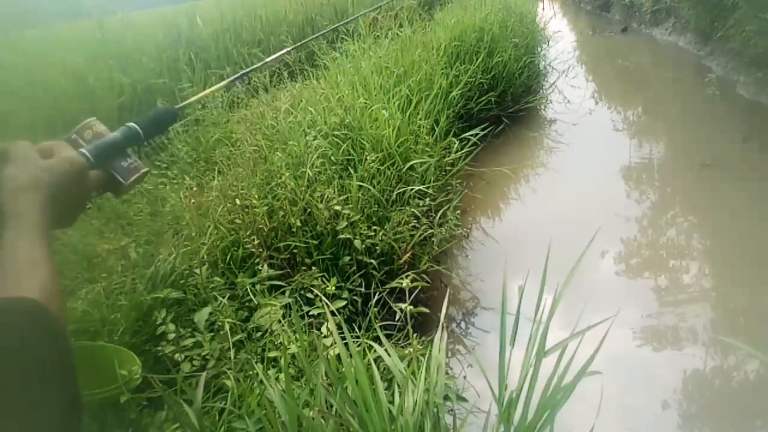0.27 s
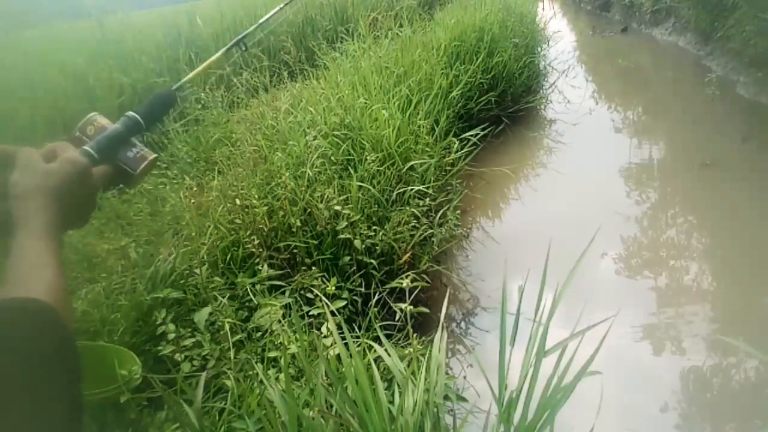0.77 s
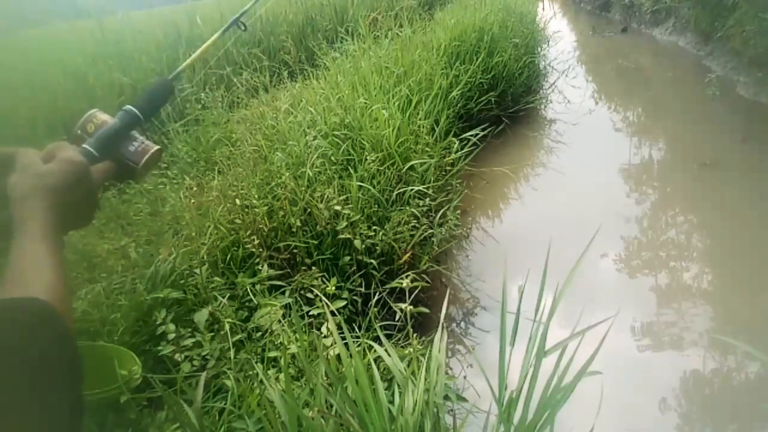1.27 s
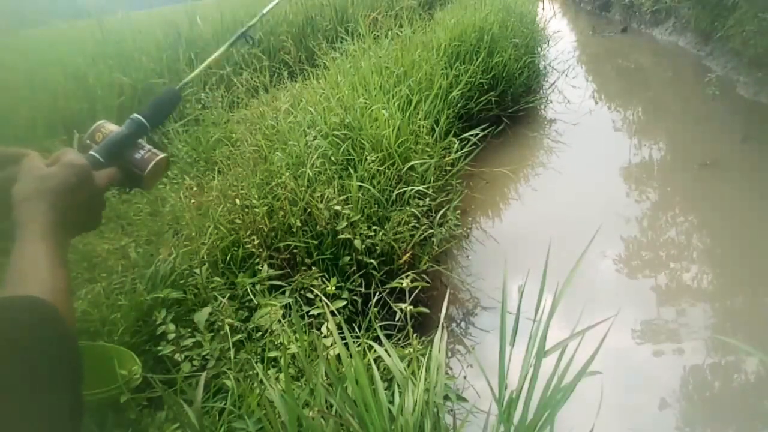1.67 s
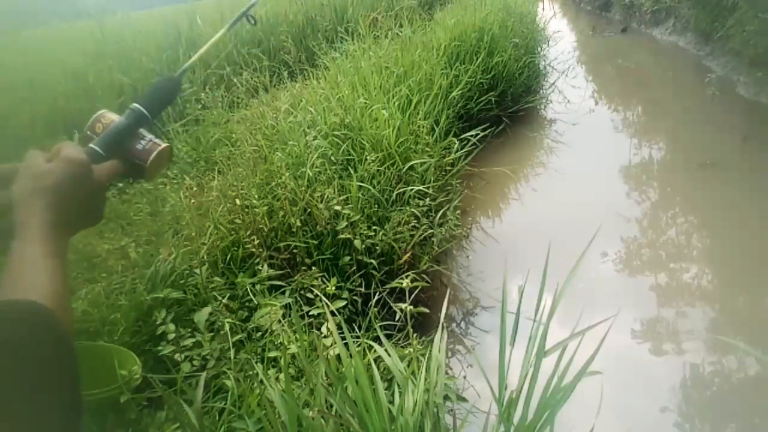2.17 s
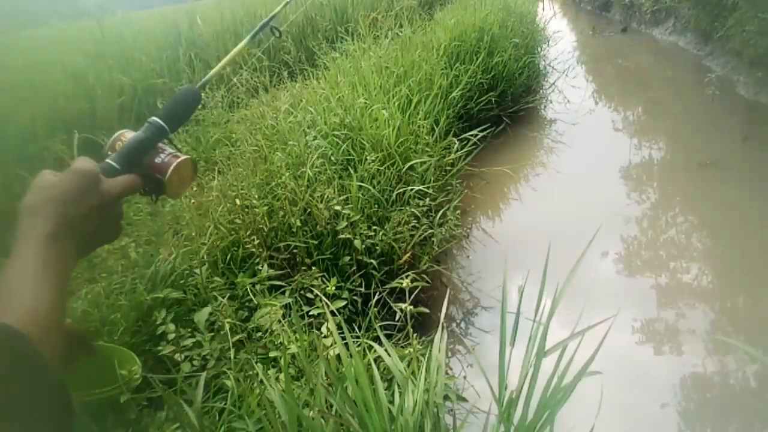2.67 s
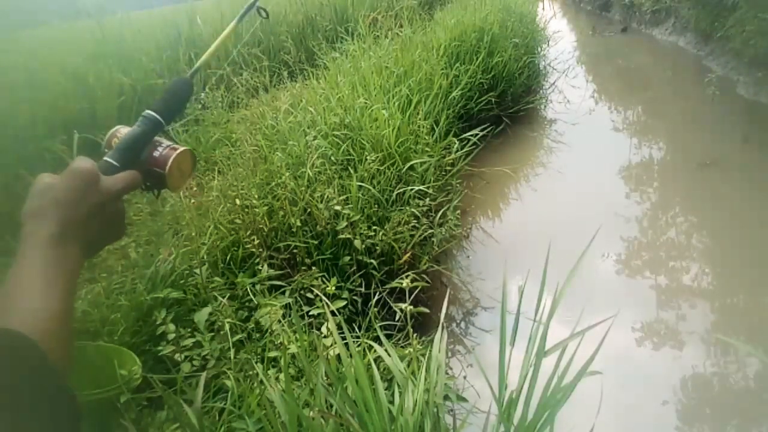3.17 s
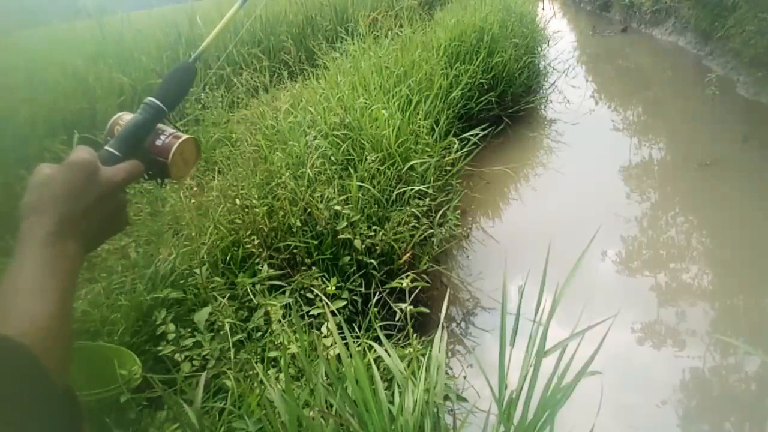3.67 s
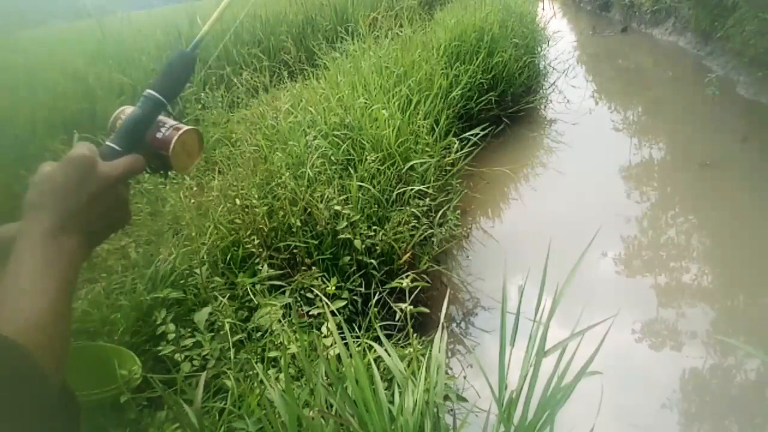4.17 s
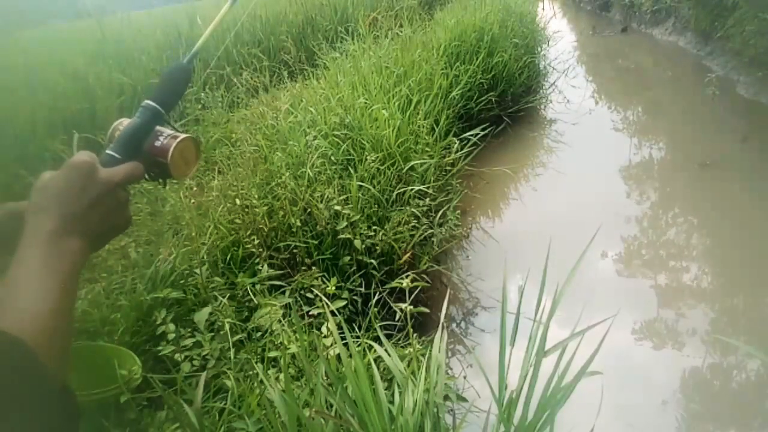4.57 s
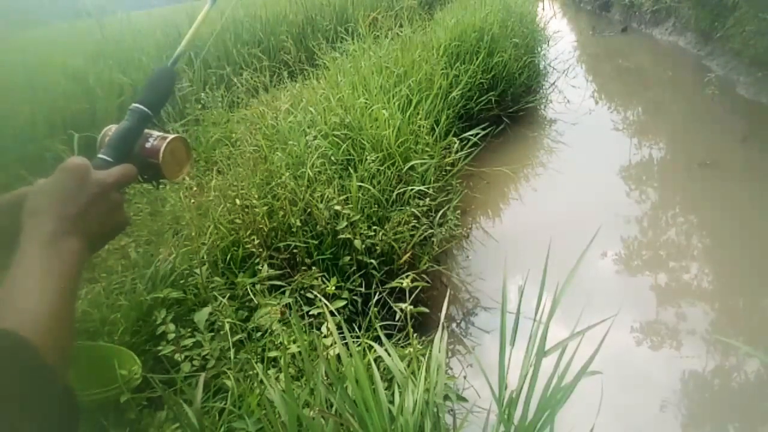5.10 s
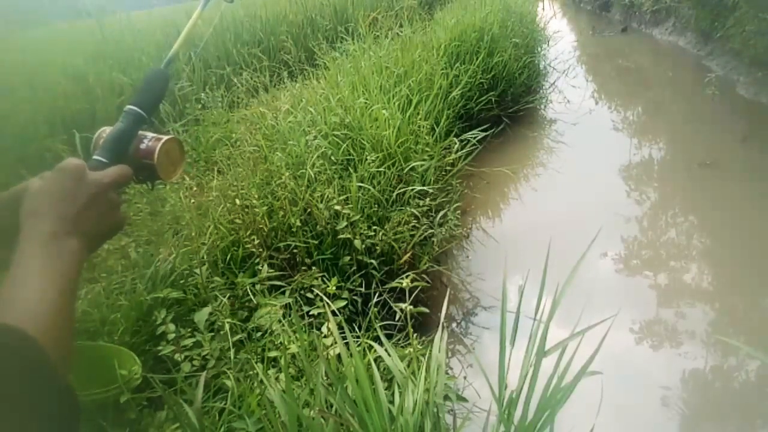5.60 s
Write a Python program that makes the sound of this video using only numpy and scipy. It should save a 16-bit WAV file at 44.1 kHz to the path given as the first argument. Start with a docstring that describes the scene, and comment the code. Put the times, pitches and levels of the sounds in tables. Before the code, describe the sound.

Beside a ditch among rice paddies, a crowd of frogs rattles continuously while nearer frogs give short, slightly falling whistles and an insect scrapes a high, often-broken buzz. Far insects hiss behind. The microphone worn by an angler picks up faint rubbing, a hollow knock just before three seconds, then low rumbling with soft bumps and sparse clicks until the end.

```python
"""A crowd of frogs rattles all along beside a ditch among rice paddies: pulses ring throat resonances.
From the start nearer frogs whistle short falling notes, and an insect scrapes out a long, often-broken buzz.
Far insects and open air add a hiss. An angler wears the microphone: at first it picks up light rubbing.
Shortly before three seconds comes one hollow knock, made of a few dying tones.
Then a heavier handling rumble of low noise with soft bumps lasts to the end; sparse random clicks are heard in it."""
import sys
import numpy as np
from scipy import signal
from scipy.fft import rfft, irfft, next_fast_len
from scipy.io import wavfile
from scipy.ndimage import uniform_filter1d, map_coordinates

SR = 44100
rng = np.random.default_rng(int(sys.argv[2]) if len(sys.argv) > 2 else 0)


def store_pcm(level_fs):
    """Save levels as 16-bit WAV."""
    pcm = np.round(np.clip(level_fs, -1, 1) * 32767).astype(np.int16)
    wavfile.write(sys.argv[1], SR, np.atleast_2d(pcm).T)


N = 257527

# throat resonances of the rattling frogs, before any swell: centre_hz, width_hz, level_db
THROAT_RESONANCES = [(1166.3, 79, -64), (1251.5, 94, -62.5), (1437, 51, -76), (1712, 91, -84.5),
                     (1937, 56, -73), (2238, 105, -58.5), (2469, 155, -59), (3230, 750, -80.5),
                     (3493, 197, -59), (3641, 67, -58), (3810, 530, -56.5), (4436, 280, -61.5),
                     (4738, 140, -58), (5955, 75, -63.5), (5972, 360, -63), (7180, 210, -69.5),
                     (8314, 180, -70.5)]
# how the high and the deep frog voices swell: time_s, change_db
HIGH_SWELL = [(0, -3), (.7, 0.5), (1.4, -2), (2.1, 1.5), (2.6, -3), (3.05, 0), (3.7, -1), (4.2, -0.5),
              (4.8, 0.5), (5.2, 0), (5.84, -0.5)]
DEEP_SWELL = [(0, -1.5), (.9, -1.5), (1.7, 1.5), (2.3, -0.5), (2.8, -1), (3.6, 1.5), (4.4, 1), (5, 1.5),
              (5.84, -.5)]
# whistling frogs by name: first_pitch_hz, last_pitch_hz, swell_db, push_time (share of the note),
# fundamental_db (against the whistle), flutter_db
WHISTLE_VOICES = {"near": (2236.5, 2165.5, 6.5, 0.9, -23.5, 0.9),
                  "high": (2271.5, 2185.5, 4, 0.8, -19, 1.27), "throaty": (2222.5, 2170, 1, 2.5, -10, 2.1)}
# nearby whistled notes, level before swell and flutter: start_s, length_s, level_db, voice name
WHISTLED_NOTES = [(0.059, 0.17, -52.5, "throaty"), (.231, 0.19, -48.5, "high"), (.876, 0.16, -41.5, "near"),
                  (1.357, 0.2, -56.5, "throaty"), (1.361, .18, -50, "high"), (2.077, 0.17, -42.5, "near"),
                  (2.483, .26, -50.5, "high"), (2.67, 0.19, -52.5, "throaty"), (3.287, 0.15, -41.5, "near"),
                  (3.671, 0.19, -48.5, "high"), (3.929, 0.201, -54, "throaty"), (4.461, .158, -43, "near"),
                  (4.836, 0.18, -49.5, "high"), (5.221, 0.16, -54.5, "throaty"),
                  (5.649, .16, -41.5, "near")]
# far frogs that keep time: first_note_s, period_s, length_s, first_pitch_hz, last_pitch_hz, level_db
FAR_WHISTLERS = [(0.659, 1.205, 0.138, 2264, 2260, -61), (.99, 1.221, 0.163, 2360, 2325, -62)]
# the voice they share: swell_db, push_time (share of the note), fundamental_db, flutter_db
FAR_WHISTLE_VOICE = (-1, -2.5, -15.5, 2.5)
# scrapes within one wing cycle: position (share of the cycle), level_db
WING_SCRAPES = [(0, -6), (0.272, -1), (0.519, -5), (.76, -7)]
# tone colour of the wings, only its shape matters: frequency_hz, level_db (per Hz)
WING_COLOUR = [(4100, -34), (4550, 7.5), (4690, 9.5), (4850, 8), (5150, -13.5), (7000, -4), (7700, -12.5),
               (9050, -11), (9480, 7), (10250, -13.5), (10600, 0), (11300, -21), (15500, -23.5)]
# high resonances of the wing, before the phrasing: centre_hz, width_hz, level_db
WING_RESONANCES = [(12150, 600, -77.5), (13200, 600, -79), (14230, 450, -78.5), (15250, 400, -77.5)]
# how hard the insect works, only differences matter: time_s, level_db
INSECT_EFFORT = [(0, 0), (.3, -4), (.65, 0), (1.25, -1), (1.5, -5), (1.85, -1.5), (3.1, 0.5), (3.8, -2),
                 (4.35, 1), (4.85, -4), (5.2, 0.5), (5.84, -2)]
# hollow tones of the knock, level before its soft onset: pitch_hz, level_db, time to fall by 60 dB (s)
KNOCK_TONES = [(380, -23, 0.024), (436, -58, 0.28), (290, -54, 0.03), (795, -46, 0.028)]
# tone colours of the light rubbing and the heavy rumble, only shapes matter: frequency_hz, level_db (per Hz)
RUB_COLOUR = [(15, -54), (25, -21), (38, -26.5), (130, 4.5), (152, 1), (194, -15), (260, -21.5), (340, -25),
              (570, -120)]
RUMBLE_COLOUR = [(15, -58), (25, -33), (61, 3.5), (92, -1), (142, -1), (252, -25), (525, -54.5), (900, -55),
                 (1170, -73), (1980, -120)]
# strokes of light rubbing, to which a flutter and an offset are added: start_s, length_s, level_db
RUB_STROKES = [(0.246, 0.41, -59.5), (0.814, 0.39, -62.5), (1.38, 0.37, -60.5), (2.145, 0.86, -59)]
# loudness of the heavy rumble, to which the rumble level offset is added: time_s, level_db
RUMBLE_LEVEL = [(3.6, -70.5), (4.05, -53.5), (4.2, -49), (4.28, -60), (4.45, -54.5), (4.8, -47.5),
                (4.93, -55), (5.15, -46), (5.45, -53.5), (5.67, -60.5), (5.76, -49.5), (5.84, -50)]
# soft bumps, level at the top of the envelope: time_s, level_db, pitch_hz
SOFT_BUMPS = [(4.02, -41.5, 66), (4.125, -33, 79), (4.211, -46, 85), (4.421, -40, 89.5), (4.577, -35, 80),
              (4.793, -33, 92), (5.035, -32.5, 86.5), (5.173, -35, 88.6), (5.762, -35.5, 84)]
# tone colour of the far hiss, only its shape matters: frequency_hz, level_db (per Hz)
HISS_COLOUR = [(30, -3.5), (120, 4), (250, -8.5), (500, -14), (900, -17.5), (1700, -16), (3000, 2),
               (6500, -4), (7800, -6), (9100, -1), (9650, 2), (10700, 0), (11400, -17), (15500, -29)]

DEEP_BELOW_HZ, HIGH_ABOVE_HZ = 1600, 3100  # voices in between do not swell
NOTE_ATTACK_S, NOTE_RELEASE_S = 0.014, 0.012
PUSH_WIDTH, SAG_POWER = 0.22, 1.26  # width is a share of the note; the power bends the fall in pitch
WING_HZ, BUZZ_DB = 28.1, -55.0  # average wing cycles a second; level of the main buzz
PHRASE_END_S, PHRASE_PERIOD_S = 0.822, 1.197  # end of the first phrase, time from one end to the next
REST_S, STOP_S, RESUME_S, REST_DB = 0.16, 0.036, 0.16, -8.5  # rest, fade-out, fade-in, drop in a rest
KNOCK_S = 2.8098
HEAVY_START_S, HEAVY_FADE_S = 3.6, 0.07  # when rumble takes over from rubbing
RUB_ATTACK_S, RUB_RELEASE_S, RUB_REST_DB = 0.042, 0.046, -77
RUB_OFFSET_DB, RUMBLE_OFFSET_DB = -1.0, -0.5  # rubbing and rumble level offsets
CLICK_DB, CLICKS_PER_S = -27.5, 45  # level relative to the low noise of the rumble
BUMP_S = 0.008  # from a bump's top to about a third of it
HISS_DB = -56
TOP_HZ = 15520


def chorus():
    """Groups of frogs ring throat resonances pulse by pulse; deep and high voices each swell together."""
    groups = [rattle(pulse_rate=94, spread=0.15, note_db=2.0, count=3) for _ in range(5)]
    high_db, deep_db = curve(HIGH_SWELL), curve(DEEP_SWELL)
    out = np.zeros(N)
    for k, (centre, width, db) in enumerate(THROAT_RESONANCES):
        swell_db = high_db * (centre > HIGH_ABOVE_HZ) + deep_db * (centre < DEEP_BELOW_HZ)
        out += resonance(groups[k % len(groups)], centre, width) * amp(db + swell_db)
    return patchy(out, depth_db=1.5)  # frogs of different size join in and drop out


def rattle(pulse_rate, spread, note_db, count):
    """Pulses of several frogs, each at its own rate and swelling in quick notes."""
    pulses = np.zeros(N)
    for own, start in rng.standard_normal((count, 2)):
        rate = pulse_rate * np.exp(spread * own + 0.06 * wobble(12))
        whole_cycles = np.floor(start + np.cumsum(rate) / SR)
        beats = np.diff(whole_cycles, prepend=whole_cycles[0])  # one pulse per finished cycle
        pulses += beats * amp(note_db * wobble(19))
    return pulses


def whistlers():
    """Three nearby frogs and two far ones each repeat their own note about every 1.2 s."""
    out = np.zeros(N)
    for start, length, db, voice in WHISTLED_NOTES:
        out += whistle(start, length, db, *WHISTLE_VOICES[voice])
    for first, period, length, first_hz, last_hz, db in FAR_WHISTLERS:
        for start in np.arange(first, N / SR - length, period):
            out += whistle(start, length, db, first_hz, last_hz, *FAR_WHISTLE_VOICE)
    return outdoors(out, wet_db=-13, t60=0.3)


def whistle(start, length, db, first_hz, last_hz, swell_db, push_at, fundamental_db, flutter_db):
    """One note sags in pitch, then stops short; the vocal sac favours the second harmonic."""
    t = clock() - start
    on = (t > 0) & (t < length)
    t = t[on]
    share = t / length

    def chance(rate):
        """A smooth random curve within the note."""
        return map_coordinates(rng.standard_normal(128), [t * rate], mode="wrap")

    pitch_hz = first_hz + (last_hz - first_hz) * share ** SAG_POWER + 7 * chance(88)
    phase = np.pi * np.cumsum(pitch_hz) / SR  # the fundamental lies an octave below the heard pitch
    attack = np.clip(t / NOTE_ATTACK_S, 0, 1)
    release = np.clip((length - t) / NOTE_RELEASE_S, 0, 1)
    flutter = amp(flutter_db * (chance(170) + chance(49)))
    push = np.exp(-((share - push_at) / PUSH_WIDTH) ** 2)
    main = amp(-swell_db * (1 - push)) * np.sin(2 * phase)
    odd = amp(fundamental_db) * (np.sin(phase) + np.sin(3 * phase))
    out = np.zeros(N)
    out[on] = attack * release * flutter * (main + odd)
    return np.sqrt(2) * amp(db) * out


def insect():
    """Each wing cycle gives a few short scrapes that excite the wing's resonances."""
    cycles = np.cumsum(WING_HZ * (1 + 0.0114 * wobble(4.5))) / SR
    scrapes = sum(amp(db) * np.exp(-((cycles - at) % 1) / 0.1) for at, db in WING_SCRAPES)
    strength = uniform_filter1d(scrapes, size=170) + 0.22  # each scrape swells over a few ms
    rasp = strength * rng.standard_normal(N)
    buzz = amp(BUZZ_DB) * coloured(rasp, [(1500, -64)] + WING_COLOUR)
    buzz += sum(amp(db) * resonance(rasp, hz, width) for hz, width, db in WING_RESONANCES)
    return buzz * phrasing()


def phrasing():
    """Gain of the buzz: it breaks off at a steady period, rests and swells back."""
    since = (clock() - PHRASE_END_S) % PHRASE_PERIOD_S
    stopping = np.clip(since / STOP_S, 0, 1)
    resuming = np.clip((REST_S + RESUME_S - since) / RESUME_S, 0, 1)
    return unit(amp(curve(INSECT_EFFORT) + REST_DB * stopping * resuming))


def knock():
    """One soft blow on something hollow: a few tones ring and die away."""
    t = np.maximum(clock() - KNOCK_S, 0)
    ring = sum(amp(db - 60 * t / t60) * np.sin(2 * np.pi * hz * t) for hz, db, t60 in KNOCK_TONES)
    onset = 1 - np.exp(-t / 0.004)
    return outdoors(ring * onset, wet_db=-13, t60=0.27)


def handling():
    """Light rubbing turns into a heavier rumble of low noise with soft bumps."""
    t = clock()
    heavy = np.clip((t - HEAVY_START_S) / HEAVY_FADE_S, 0, 1)
    rub_flutter = amp(RUB_OFFSET_DB + 1.8 * wobble(12))
    rub = noise(RUB_COLOUR) * rubbing() * rub_flutter * (1 - heavy)

    # sparse random clicks are heard along with the rumble
    impulses = (rng.random(N) < CLICKS_PER_S / SR) * (2 * rng.random(N) - 1)
    click_colour = [(100, -14), (300, 7.5), (900, -8.0), (2000, -15), (8000, -40)]
    clicks = amp(CLICK_DB) * coloured(impulses, click_colour)
    rumble = coloured(noise(RUMBLE_COLOUR), [(200, -7.0), (500, -6)])  # gentle low-frequency tilt
    rumble = (rumble + clicks) * amp(curve(RUMBLE_LEVEL) + RUMBLE_OFFSET_DB) * heavy

    bumps = np.zeros(N)
    for at, db, hz in SOFT_BUMPS:
        bumps += amp(db) * np.exp(-((t - at) / BUMP_S) ** 2) * np.sin(2 * np.pi * hz * (t - at))
    return rub + rumble + bumps


def rubbing():
    """Gain of the light rubbing: each stroke rises, holds and dies away."""
    t = clock()
    gain = np.full(N, amp(RUB_REST_DB))
    for start, length, db in RUB_STROKES:
        rise = np.minimum((t - start) / RUB_ATTACK_S, 0)
        fall = np.maximum((t - start - length) / RUB_RELEASE_S, 0)
        gain += amp(db) * np.exp(rise - fall)
    return gain


def field():
    """Countless far insects and the open air merge into a hiss, made of patchy noise."""
    return patchy(noise(HISS_COLOUR), depth_db=2.5) * amp(HISS_DB)


def outdoors(x, wet_db, t60):
    """Banks and plants scatter a short diffuse tail."""
    t = np.arange(SR // 2) / SR
    tail = rng.standard_normal(len(t)) * amp(-60 * t / t60)
    return x + amp(wet_db) * signal.fftconvolve(x, tail / np.linalg.norm(tail))[:N]


def patchy(x, depth_db):
    """Random gain in patches about 120 Hz wide and a tenth of a second long; overall level stays."""
    z = signal.stft(x, nperseg=1024)[2]
    patch = np.outer(np.hanning(7), np.hanning(19))  # frequency by time
    gain = signal.fftconvolve(rng.standard_normal(z.shape), patch, "same")
    varied = signal.istft(z * amp(depth_db * unit(gain)), nperseg=1024)[1][:N]
    return unit(varied) * np.std(x)


def resonance(x, centre_hz, width_hz):
    """x rung through one steep-sided resonance, 9 dB down at width_hz off centre, at rms 1."""
    return unit(filtered(x, lambda hz: (1 + 1j * (hz - centre_hz) / width_hz) ** -3))


def noise(spectrum):
    """Coloured noise of rms 1."""
    return coloured(rng.standard_normal(N), spectrum)


def coloured(x, spectrum):
    """x shaped by (Hz, dB) points on a log frequency axis, at rms 1."""
    f, db = np.transpose(spectrum)
    return unit(filtered(x, lambda hz: amp(np.interp(np.log(hz + 1), np.log(f), db))))


def filtered(x, response):
    """x with each frequency scaled by response(hz)."""
    size = next_fast_len(N + 8192)  # spare room for ringing
    return irfft(rfft(x, size) * response(np.fft.rfftfreq(size, 1 / SR)), size)[:N]


def wobble(rate):
    """A smooth random curve with rate random points a second."""
    return map_coordinates(rng.standard_normal(1024), [clock() * rate], mode="wrap")


def curve(rows):
    """(s, value) rows joined by straight lines."""
    return np.interp(clock(), *np.transpose(rows))


def clock():
    """The time of every sample in seconds."""
    return np.arange(N) / SR


def unit(x):
    """Scale to rms 1."""
    return x / np.sqrt(np.mean(x ** 2) + 1e-20)


def amp(db):
    """Decibels to gain."""
    return 10 ** (np.asarray(db) / 20)


def scene():
    """All sources add up at one microphone."""
    return (chorus() + whistlers() + insect() + knock() + handling() + field())[None]


def record(dry):
    """The microphone keeps nothing above its band limit."""
    return filtered(dry[0], lambda hz: hz < TOP_HZ)[None]


dry = scene()
out = record(dry)
store_pcm(out)
```